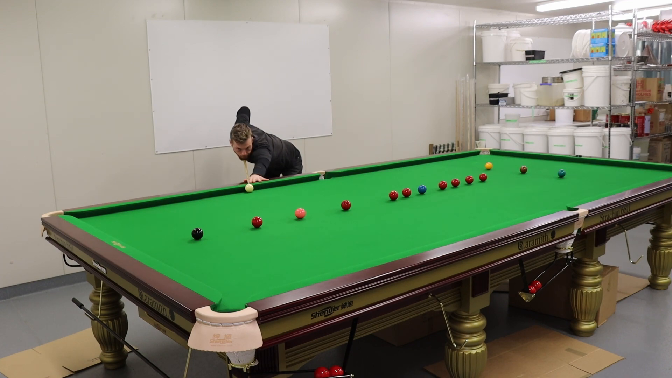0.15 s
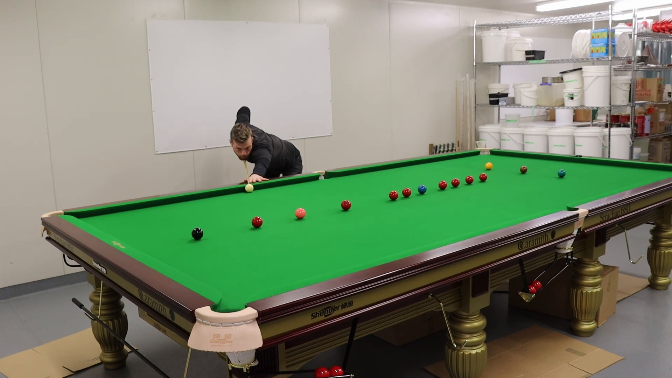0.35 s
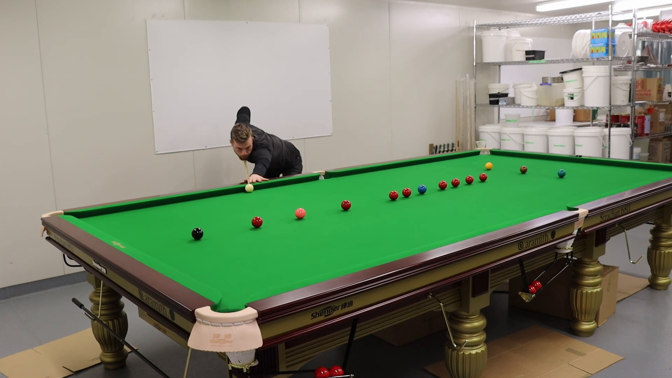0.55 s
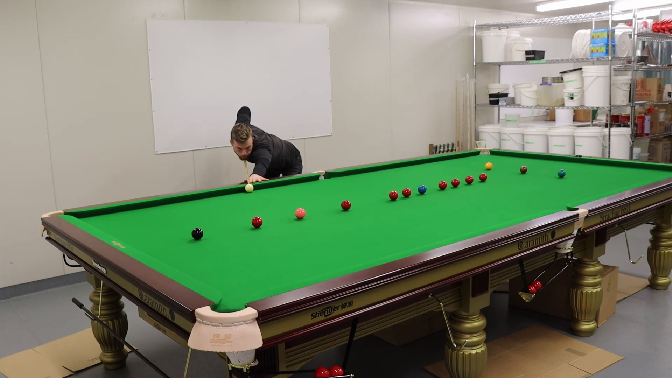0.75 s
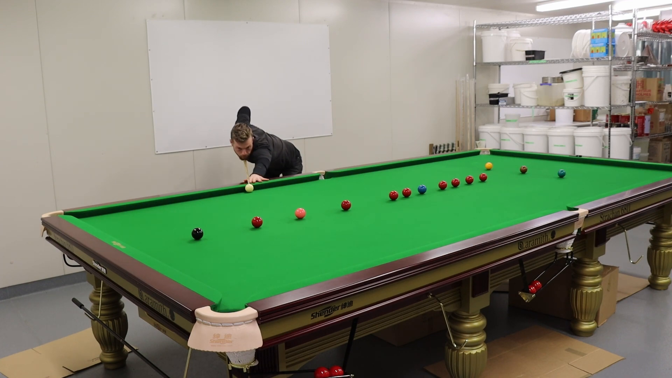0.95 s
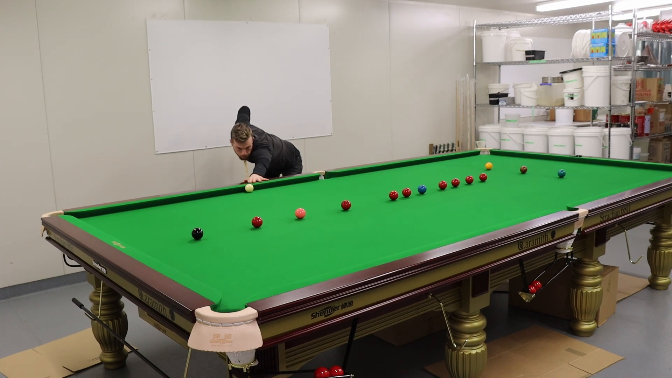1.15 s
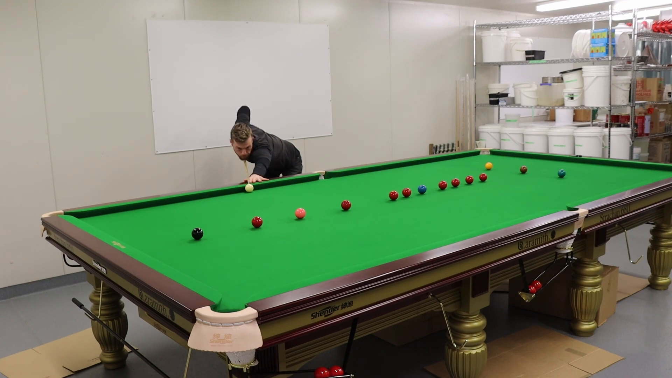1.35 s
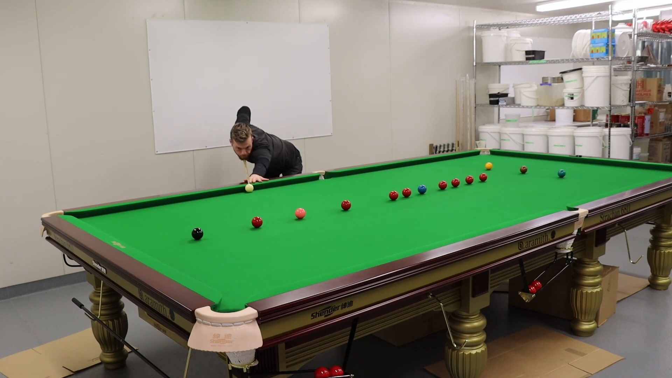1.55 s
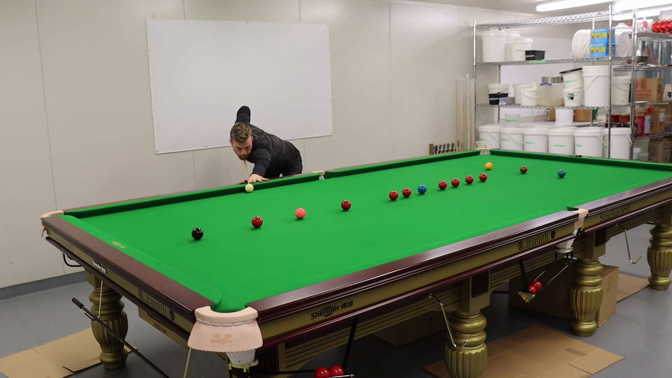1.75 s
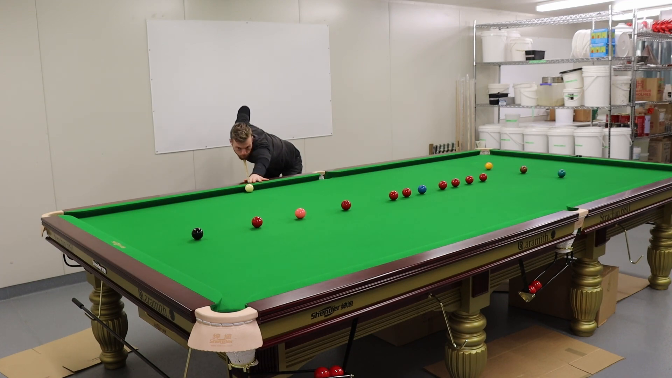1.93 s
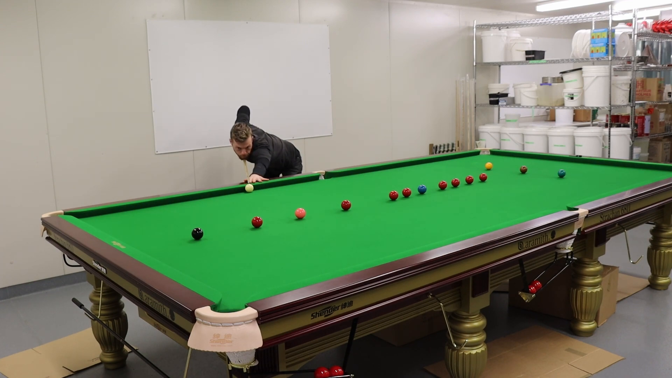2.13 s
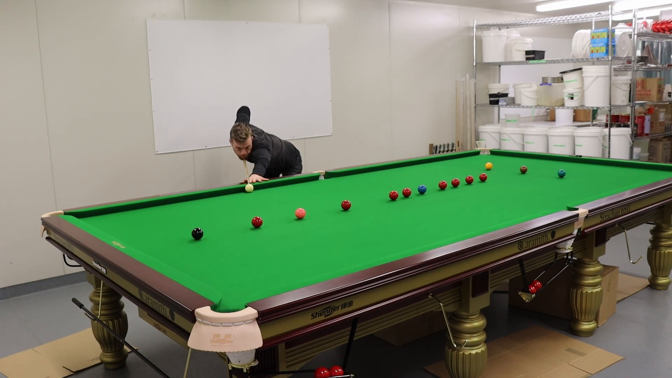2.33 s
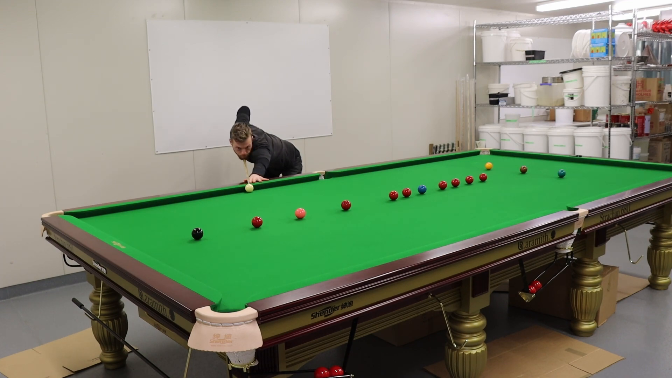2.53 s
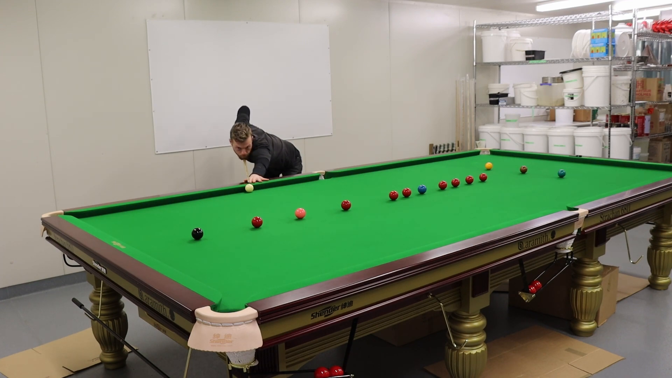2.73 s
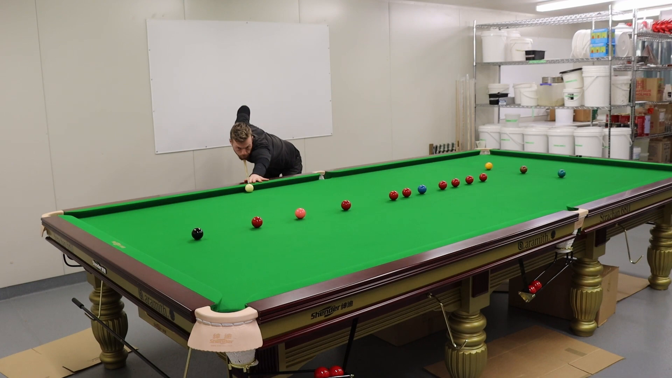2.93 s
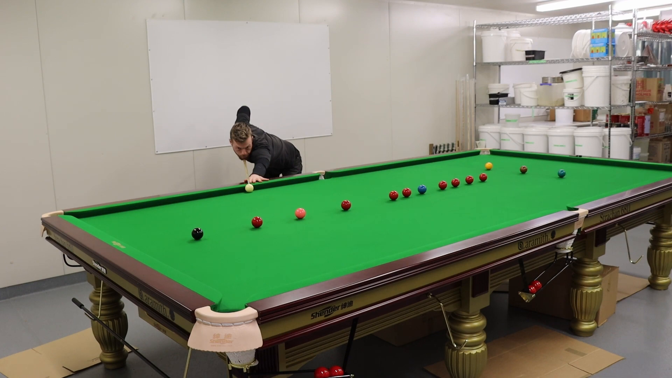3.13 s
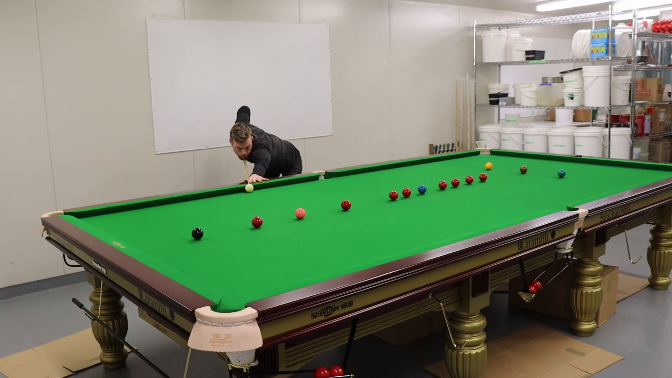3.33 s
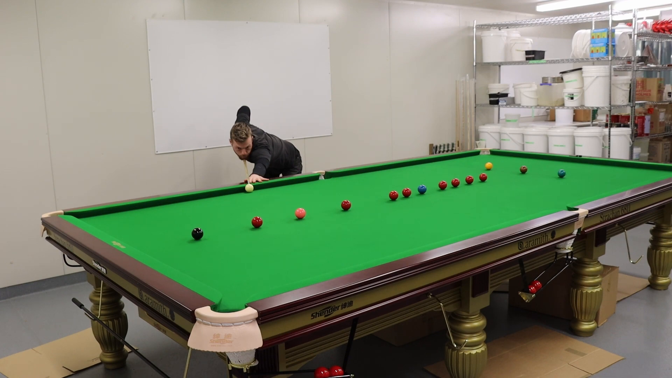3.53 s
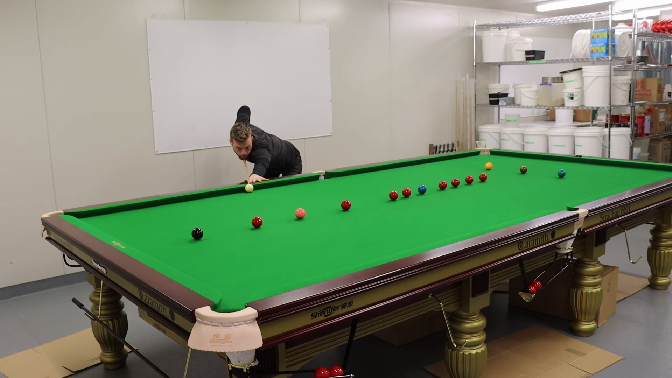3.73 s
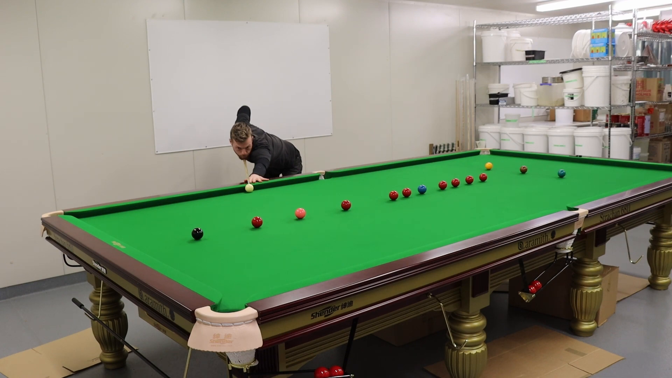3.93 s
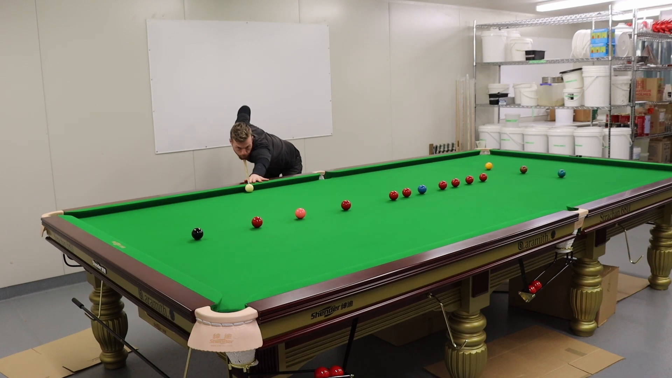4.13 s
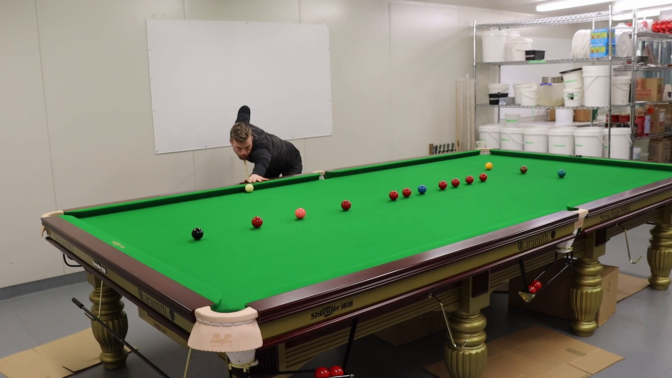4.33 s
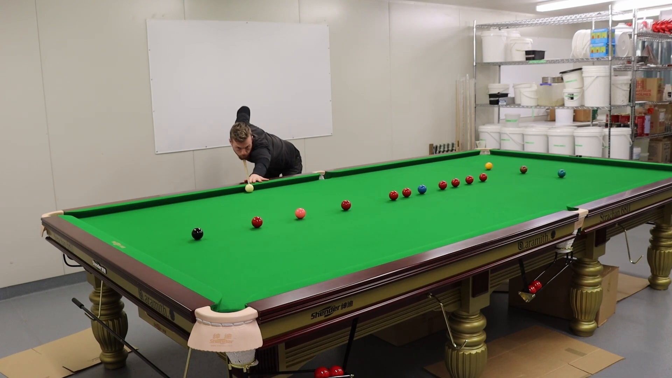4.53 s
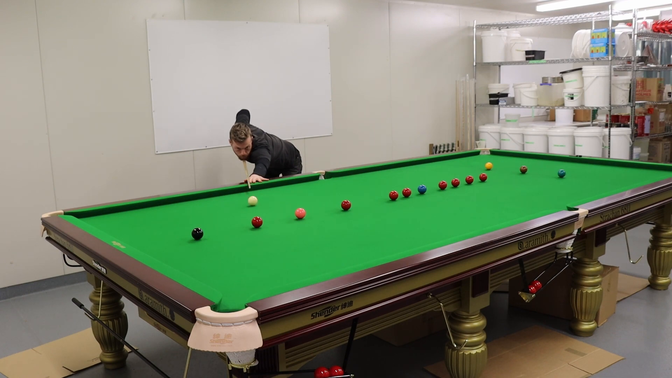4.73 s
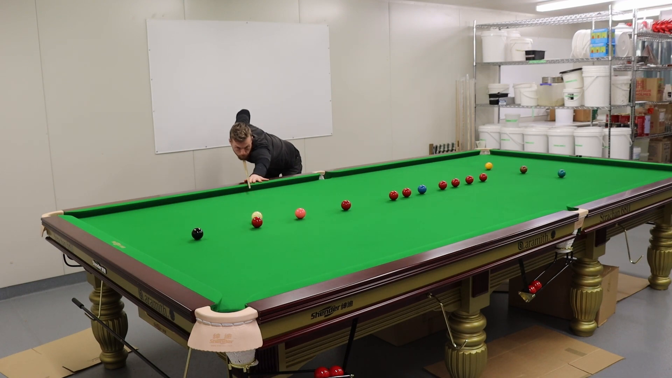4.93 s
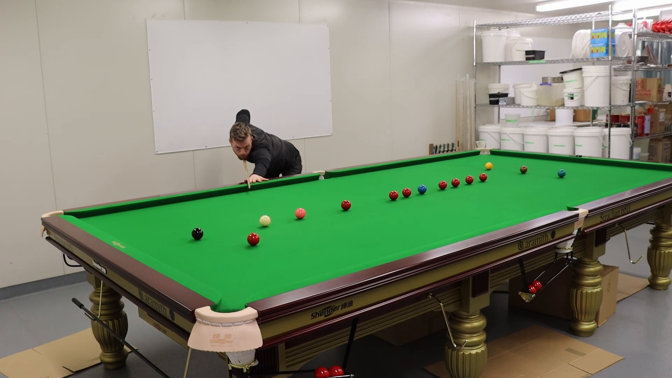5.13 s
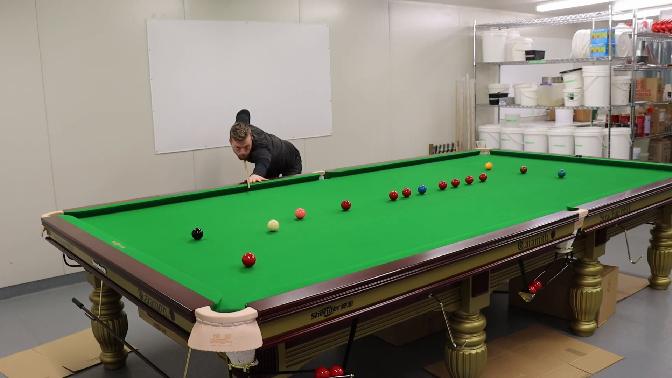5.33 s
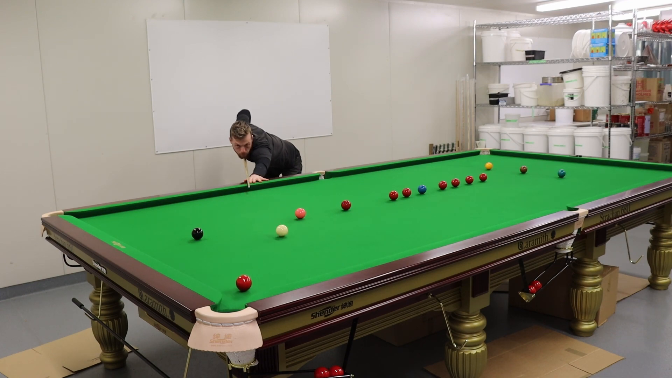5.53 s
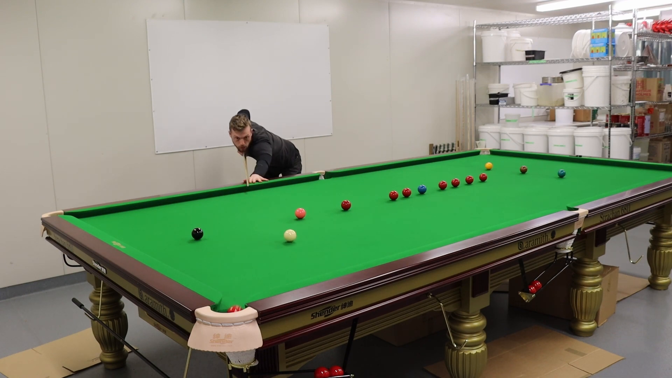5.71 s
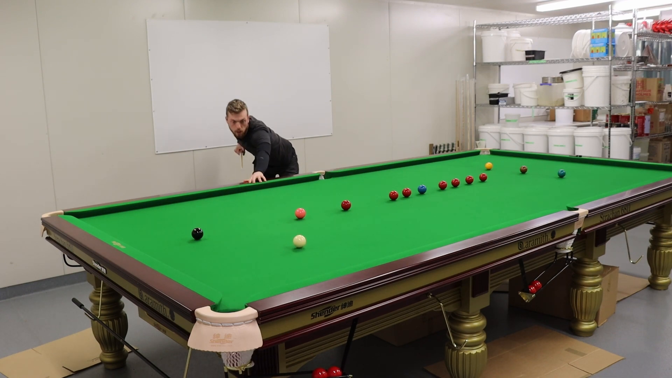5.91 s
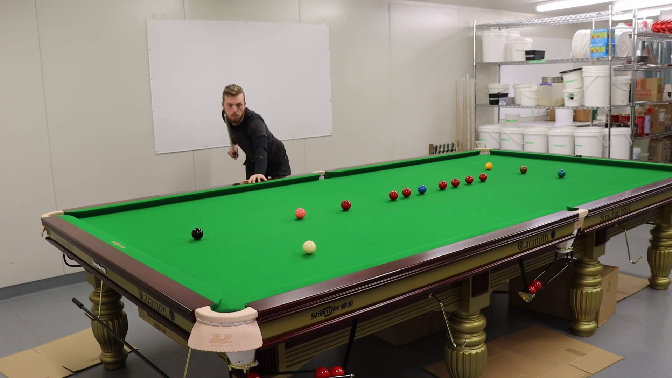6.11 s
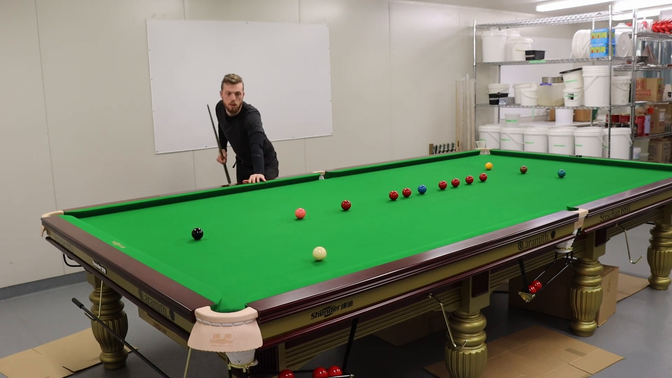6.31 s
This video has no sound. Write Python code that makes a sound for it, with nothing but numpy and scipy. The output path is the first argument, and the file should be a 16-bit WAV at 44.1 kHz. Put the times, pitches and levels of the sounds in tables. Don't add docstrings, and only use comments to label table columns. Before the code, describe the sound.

Snooker shot in a humming room: quiet sliding hisses, a woody cue knock, one sharp overloaded clack, then a small pocket rattle and dull thud.

```python
import sys
import numpy as np
from scipy import signal
from scipy.fft import rfft, irfft, next_fast_len
from scipy.io import wavfile
from scipy.ndimage import minimum_filter1d

SR = 44100
rng = np.random.default_rng(int(sys.argv[2]) if len(sys.argv) > 2 else 0)


def volts_from_db(level):
    exponent = np.asarray(level, float) / 20
    return 10 ** exponent


def dump(signal):
    limited = np.clip(np.atleast_2d(signal).T, -1, 1)
    pcm = np.round(limited * 32767).astype(np.int16)
    wavfile.write(sys.argv[1], SR, pcm)


N = 285194


def clack():
    contact_s, swing_hz, swing_t60_s, level_db = 0.00032, 2340, 0.0012, 19
    t = np.arange(SR // 20) / SR
    push = np.sin(np.pi * np.clip(t / contact_s, 0, 1)) ** 1.6
    swing = ring(np.gradient(push) / 2, swing_hz, swing_t60_s)
    swing += volts_from_db(-25) * band(t == 0, 9200, 14000)
    no_bass = signal.butter(4, 1100, "high", fs=SR, output="sos")
    return volts_from_db(level_db) * signal.sosfilt(no_bass, swing)


def tip():
    level_db, knock_hz, t60_s = -2.5, 980, 0.0036
    knock = ring(np.arange(SR // 20) == 0, knock_hz, t60_s)
    return volts_from_db(level_db) * band(knock, 320, 3000)


# pitch_hz [Hz], level_db [dB per Hz]
CHALK = [(150, -18), (500, -3), (1200, 0), (3000, 2), (4500, -6), (6000, -21), (9000, -34), (12500, -29),
         (15000, -49)]
CUE_HZ = [226, 263, 420, 646, 844, 1001, 1077, 1346, 1561, 1861, 2025, 2219, 2605, 2887, 3208, 3263, 3629,
          4019, 4390, 4834, 5308, 5846, 6498]
# level_db [dB], t60_s [s], build_s [s]
CUE = [(-23.5, 0.15, 0.0072), (-31, 0.18, 0.0092), (-23, 0.032, 0.0054), (-32, 0.041, 0.0093),
       (-15.5, 0.15, 0.0071), (-17, 0.056, 0.0061), (-11.5, 0.076, 0.0065), (-19.5, 0.31, 0.0086),
       (-23.5, 0.11, 0.0055), (-20, 0.079, 0.0078), (-15.5, 0.049, 0.0065), (-13, 0.064, 0.0037),
       (-6.5, 0.055, 0.0073), (-15, 0.063, 0.0075), (-14, 0.055, 0.0096), (-13, 0.067, 0.011),
       (-10.5, 0.048, 0.0085), (-16, 0.068, .011), (-23, 0.047, 0.008), (-20, 0.056, 0.01),
       (-30, 0.044, 0.011), (-27, 0.051, 0.011), (-41, .04, .01)]


def cue():
    t = np.arange(SR // 2) / SR
    hz_axis = np.arange(len(t) // 2 + 1) * SR / len(t)
    spectrum = rfft(rng.standard_normal(len(t))) * volts_from_db(at_hz(CHALK, hz_axis))
    scrape = rms_one(irfft(spectrum, len(t)))
    out = volts_from_db(-10.5) * scrape * (1 - np.exp(-(t / 0.0051) ** 2)) * np.exp(-t / 0.015)
    for hz, (db, t60, build_s), turn in zip(CUE_HZ, CUE, rng.random(len(CUE))):
        swell = 1 - np.exp(-(t / build_s) ** 2)
        out += volts_from_db(db + 0.5 - 60 * t / t60) * swell * np.sin(2 * np.pi * (hz * t + turn))
    return out


# start_s [s], level_db [dB], rattle_s [s], brightness_db [dB]
DROP = [(6.013, -47, 0.012, 6), (6.071, -35.5, 0.0055, 2), (6.075, -26.5, 0.0073, -3.5),
        (6.084, -39.5, .005, 4), (6.186, -31, 0.0049, -20), (6.192, -28, 0.0034, -18.5),
        (6.197, -27, 0.0025, -3.5), (6.201, -13, 0.0016, -6), (6.207, -19.5, 0.0048, 3.5),
        (6.2127, -21, .004, -0.5), (6.223, -24.5, 0.0043, -1), (6.227, -37.5, .005, -5),
        (6.237, -29.5, 0.0058, -26)]
# pitch_hz [Hz], width_hz [Hz], level_db [dB]
RAIL = [(1400, 190, -10), (3170, 1700, -4.5), (4170, 370, 5), (4270, 120, 3), (8300, 450, -5),
        (11400, 500, -1), (11900, 150, 5)]


def drop(start_s):
    lands_s, net_damps_db, net_rings_db = 6.18, -5.5, 1.5
    t = start_s + np.arange(SR // 2) / SR
    grit = rng.standard_normal(len(t)) * volts_from_db(2.25 * rng.standard_normal(len(t)))
    dull, bright = np.zeros((2, len(t)))
    for s, db, length_s, bright_db in DROP:
        shape = volts_from_db(db) * np.exp(-np.abs(t - s) / np.where(t > s, length_s, .0012))
        dull += shape
        bright += shape * volts_from_db(bright_db)
    low = band(grit * dull, 510, 6400)
    high = volts_from_db(-4) * band(grit * bright, 5200, 13000)
    in_net = t < lands_s
    struck = high * np.where(in_net, volts_from_db(net_rings_db), 1)
    struck += low * np.where(in_net, volts_from_db(net_damps_db), 1)
    wires = sum(volts_from_db(db) * resonance(struck, hz, width_hz) for hz, width_hz, db in RAIL)
    return low + high + wires


# start_s [s], level_db [dB], pitch_hz [Hz], t60_s [s]
THUD = [
    (4.66, -40, 55, .5),
    (5.93, -44, 45, .3),
    (5.0685, -12, 694, 0.016),
    (6.075, -35.5, 650, 0.058),
    (6.102, -24.5, 151, 0.12),
    (6.19, -25, 232, .08),
    (6.22, -41, 49.5, .4),
    (6.41, -34.5, 285, 0.53),
]


def thuds():
    t, out = np.arange(N) / SR, 0
    for s, db, hz, t60 in THUD:
        age = np.maximum(t - s, 0)
        out += volts_from_db(db - 60 * age / t60) * (1 - np.exp(-age * hz)) * np.sin(2 * np.pi * hz * age)
    return out


# pitch_hz [Hz], level_db [dB per Hz]
SLIDE_COLOUR = [(1500, -13), (3000, -1), (5000, -6.5), (8000, -10), (10000, -11), (12000, -6.5),
                (14000, -16), (16000, -28)]
# top_speed_s [s], level_db [dB]
PUSHES = [
    (0.07, -63.5),
    (1.56, -66.5),
    (2.40, -63.5),
    (3.17, -67.5),
]
# start_s [s], level_db [dB], length_s [s]
PULLS = [
    (0.63, -78, .06),
    (1.02, -69, .19),
    (1.878, -69, 0.18),
    (2.64, -68, 0.15),
    (3.38, -81, .05),
    (4.17, -68.5, 0.27),
]
# time_s [s], level_db [dB]
WITHDRAW = [
    (5.6, -95),
    (5.75, -74),
    (5.95, -66.5),
    (6.2, -62),
]


def slide():
    push_swell_db_s, push_stop_db_s = 75, 120
    pull_start_db_s, pull_sag_db_s, pull_stop_db_s, pull_dip_db = 300, 22, 200, 3
    delivery_s, delivery_db, delivery_swell_db_s = 4.61, -57.5, 398
    t = np.arange(N) / SR
    gain = volts_from_db(in_time(WITHDRAW))
    gain += volts_from_db(delivery_db - delivery_swell_db_s * np.abs(t - delivery_s))
    for s, db in PUSHES:
        gain += volts_from_db(db - np.where(t < s, push_swell_db_s * (s - t), push_stop_db_s * (t - s)))
    for s, db, length_s in PULLS:
        held = np.clip(t - s, 0, length_s)
        sag_db = pull_sag_db_s * held + pull_dip_db * np.sin(np.pi * held / length_s) ** 2
        start_db = pull_start_db_s * np.maximum(s - t, 0)
        stop_db = pull_stop_db_s * np.maximum(t - s - length_s, 0)
        gain += volts_from_db(db - sag_db - start_db - stop_db)
    return gain * volts_from_db(6.0) * stereo_noise(lambda hz: volts_from_db(at_hz(SLIDE_COLOUR, hz)))


# pitch_hz [Hz], level_db [dB per Hz]
AIR = [(15, -52), (40, -22), (80, -13), (161, -1), (292, -8), (450, -13.5), (711, -19.5), (1000, -19.5),
       (1900, -24.5), (2460, -34.5), (4000, -39), (8000, -45.5), (12500, -46.5), (15800, -53)]
# pitch_hz [Hz], width_hz [Hz], level_db [dB rms]
HUM = [(99, 7.6, -50), (149.6, 17.5, -45), (198.6, 19, -51.5), (237.2, 15, -49), (353.4, 6.2, -51),
       (448, 18, -60.5), (562.8, 9.8, -61), (601, 67, -59)]


def ventilation():
    air_db = -38.5
    out = volts_from_db(air_db - 3.5) * stereo_noise(lambda hz: volts_from_db(at_hz(AIR, hz)))

    def peaks(hz):
        power = sum(volts_from_db(2 * db) / w / (1 + (2 * (hz - f) / w) ** 4) for f, w, db in HUM)
        return np.sqrt(power)

    hum_rms = np.sqrt(sum(volts_from_db(2 * db) for f, w, db in HUM))
    out += hum_rms * stereo_noise(peaks)
    out[0] = np.roll(out[0], 6)
    return out


# pitch_hz [Hz], level_db [dB rms]
WHINE = [(554.5, -58.5), (2272, -78.5), (10874, -85.5), (13103, -92)]


def whine():
    t = np.arange(N) / SR
    return sum(np.sqrt(2) * volts_from_db(db) * np.sin(2 * np.pi * hz * t) for hz, db in WHINE)


def in_time(rows):
    s, value = np.transpose(rows)
    return np.interp(np.arange(N) / SR, s, value)


def at_hz(points, hz):
    table_hz, value = np.transpose(points)
    return np.interp(np.log(np.maximum(hz, 1)), np.log(table_hz), value)


def rms_one(x):
    return x / np.sqrt(np.mean(x ** 2) + 1e-20)


def ring(clicks, hz, t60):
    r, w = volts_from_db(-60 / (t60 * SR)), 2 * np.pi * hz / SR
    return signal.lfilter([0, np.sin(w)], [1, -2 * r * np.cos(w), r * r], clicks)


def resonance(x, hz, width_hz):
    r = np.exp(-np.pi * width_hz / SR)
    feed = np.array([1, 0, -1]) * (1 - r * r) / 2
    return signal.lfilter(feed, [1, -2 * r * np.cos(2 * np.pi * hz / SR), r * r], x)


def band(x, low_hz, high_hz):
    edges_hz = [low_hz, min(high_hz, .45 * SR)]
    return signal.sosfilt(signal.butter(2, edges_hz, "band", fs=SR, output="sos"), x)


# pitch_hz [Hz], likeness [-1 to 1]
LIKENESS = [(60, 0.97), (150, 0.99), (380, 1), (950, 0.48), (2380, 0.35), (5980, -0.03), (15000, -0.06)]
# pitch_hz [Hz], level_db [dB]
LEFT_DB = [(60, 0.5), (240, 3), (950, 1.5), (3770, -0.5), (15000, 3)]


def spread(mid, side, alike):
    return np.sqrt(1 + alike) * mid + np.sqrt(1 - alike) * side * [[1], [-1]]


def stereo_noise(shape):
    size = next_fast_len(N)
    hz = np.arange(size // 2 + 1) * SR / size
    mid, side = rfft(rng.standard_normal((2, size)))
    pair = spread(mid, side, np.clip(at_hz(LIKENESS, hz), 0, 1))
    left = volts_from_db(at_hz(LEFT_DB, hz) / 2)
    return rms_one(irfft(pair * shape(hz) * [left, 1 / left], size)[:, :N])


# pitch_hz [Hz], t60_s [s]
ROOM_T60 = [(100, 0.77), (400, 0.95), (1000, 0.59), (2000, 0.95), (3500, 0.82), (6000, 0.62), (10000, 0.39),
            (15000, 0.26)]


def room(build_s):
    t = np.arange(SR) / SR
    white, out = rng.standard_normal((2, 2, SR)), 0
    edges = 60 * 2 ** np.arange(0, 8.1, .5)
    for k, (low, high) in enumerate(zip(edges, edges[1:])):
        half_octave = signal.butter(2, [low, high], "band", fs=SR, output="sos")
        mid, side = signal.sosfilt(half_octave, white[k % 2])
        hz = np.sqrt(low * high)
        pair = spread(mid, side, np.clip(at_hz(LIKENESS, hz) - .25, 0, 1))
        out = out + pair * volts_from_db(-60 * t / at_hz(ROOM_T60, hz))
    out = out * (1 - np.exp(-(t / build_s) ** 2))
    return out / np.sqrt(np.sum(out ** 2) / 2)


def add(out, start_s, sound, left_db, wet_db, build_s, direct_db=0, echoes=()):
    path = volts_from_db(wet_db) * room(build_s)
    path[:, 0] += volts_from_db(direct_db + np.array([left_db, -left_db]) / 2)
    for delay_s, sign, *side_db in echoes:
        path[:, round(delay_s * SR)] += np.sign(sign) * volts_from_db(np.array(side_db))
    heard = signal.fftconvolve(sound[None], path, axes=1)
    at = round(start_s * SR)
    out[:, at:at + heard.shape[1]] += heard[:, :N - at]


# delay_s [s], sign [+1 or -1], left_db [dB], right_db [dB]
TIP_ECHOES = [(.0022, -1, -12, -11), (.0050, -1, 1, -14)]
# delay_s [s], sign [+1 or -1], left_db [dB], right_db [dB]
ECHOES = [(.00038, 1, -12, -10), (.0026, 1, -2, -2), (.0036, -1, -7, -7), (.0044, -1, -7, -16),
          (.0052, -1, -5, -13), (.0061, -1, -2, -11), (.0080, -1, -20, -9), (.0104, -1, -16, -13),
          (.0135, 1, -15, -15), (.0145, -1, -14, -17), (.0165, -1, -9, -16)]


def scene():
    tip_s, clack_s, drop_s = 4.6385, 5.0685, 5.9
    out = ventilation() + whine() + slide() + thuds()
    add(out, tip_s, tip(), left_db=2.0, wet_db=-4.0, build_s=0.0097, echoes=TIP_ECHOES)
    add(out, tip_s, cue(), left_db=3.5, wet_db=0.94, build_s=0.0025)
    add(out, clack_s, clack(), direct_db=4.0, left_db=1.5, wet_db=1.0, build_s=0.004, echoes=ECHOES)
    add(out, drop_s, drop(drop_s), left_db=4.5, wet_db=-2.0, build_s=0.0029)
    return out


def low_pass(x):
    return signal.sosfilt(signal.butter(12, 15700, fs=SR, output="sos"), x)


def record(dry):
    limit_db, attack_s, hold_s, release_db_s = 4, .0011, 0.038, 80
    over_db = np.maximum(20 * np.log10(np.abs(dry).max(0) + 1e-9) - limit_db, 0)
    hold = round(hold_s * SR) // 2 * 2 + 1
    held = -minimum_filter1d(-over_db, hold, origin=hold // 2)
    ramp = release_db_s * np.arange(N) / SR
    cut_db = np.maximum.accumulate(held + ramp) - ramp
    r = np.exp(-1 / (attack_s * SR))
    gain = volts_from_db(-signal.lfilter([1 - r], [1, -r], cut_db))
    capsule = signal.butter(4, 15000, fs=SR, output="sos")
    x = np.clip(signal.sosfilt(capsule, dry) * gain, -.99, .99)
    x = signal.sosfilt(signal.cheby2(14, 40, 16300, fs=SR, output="sos"), x)
    return low_pass(x)


dry = scene()
out = record(dry)
dump(out)
```